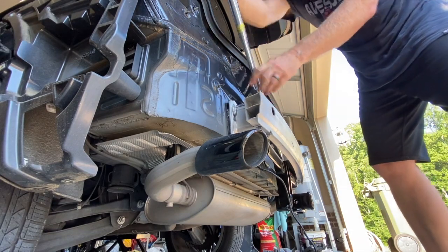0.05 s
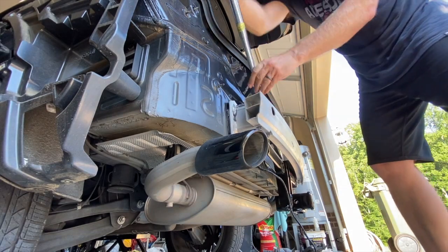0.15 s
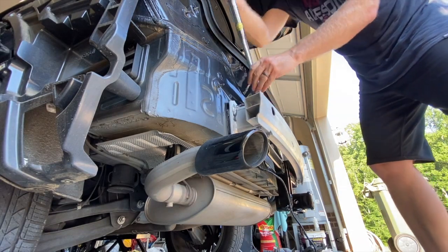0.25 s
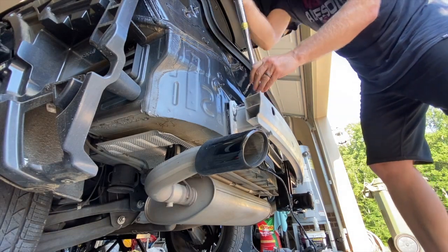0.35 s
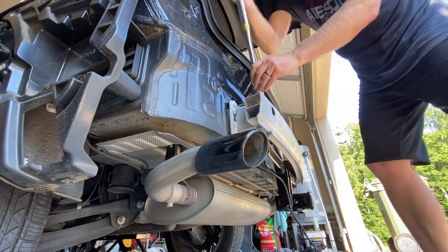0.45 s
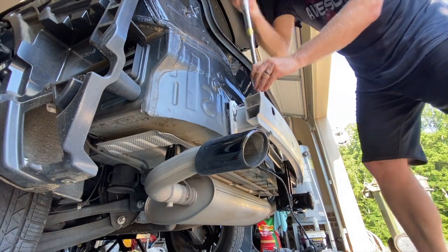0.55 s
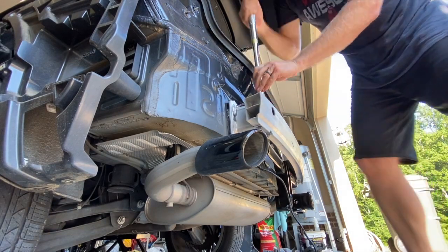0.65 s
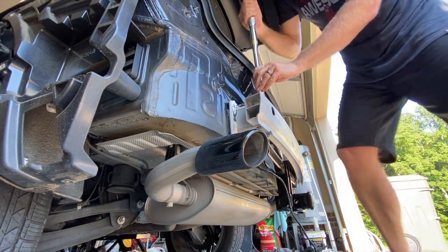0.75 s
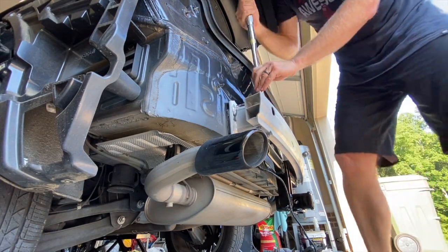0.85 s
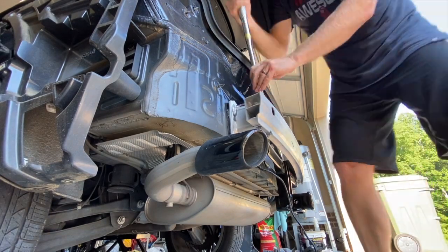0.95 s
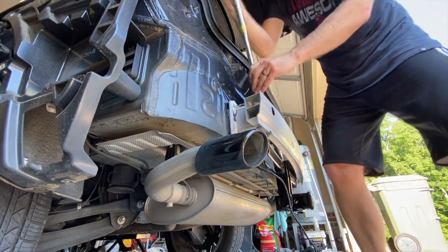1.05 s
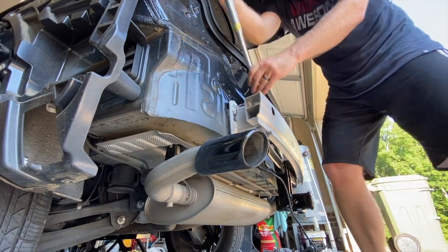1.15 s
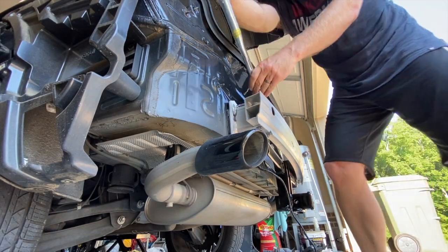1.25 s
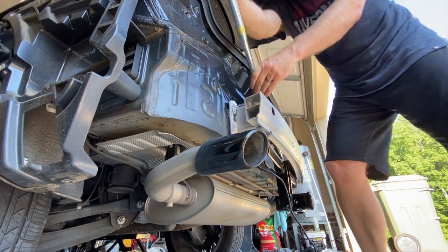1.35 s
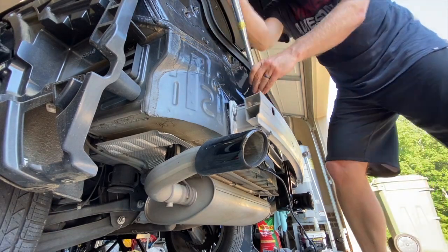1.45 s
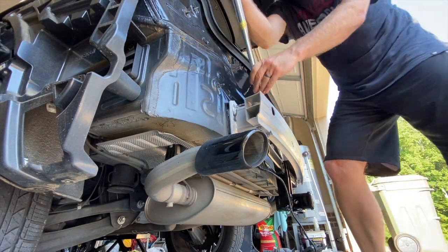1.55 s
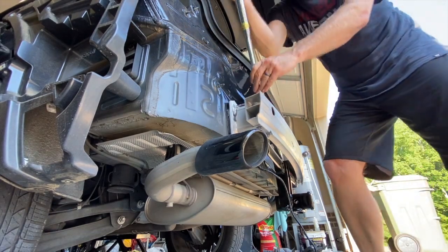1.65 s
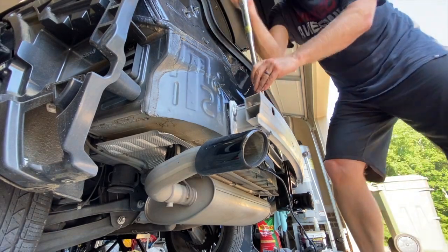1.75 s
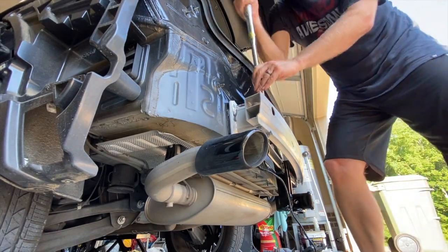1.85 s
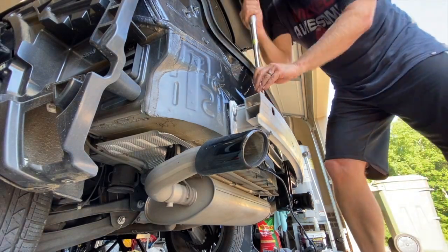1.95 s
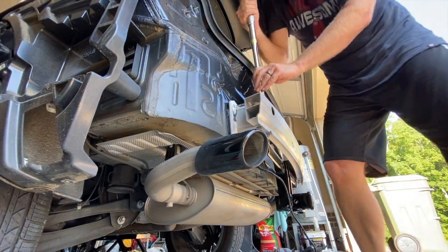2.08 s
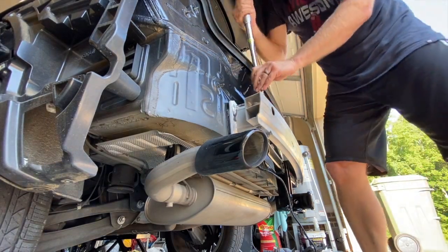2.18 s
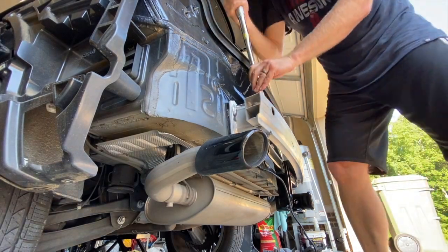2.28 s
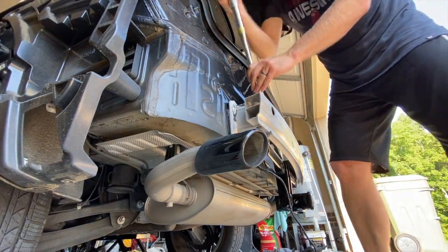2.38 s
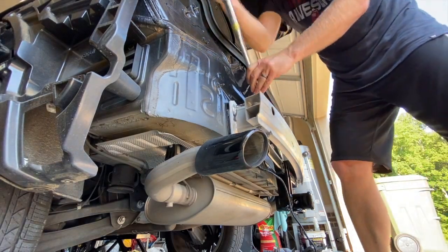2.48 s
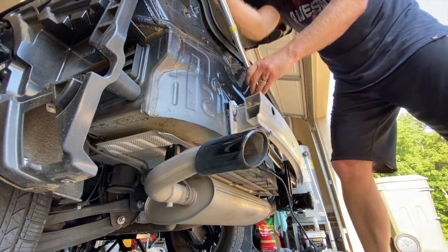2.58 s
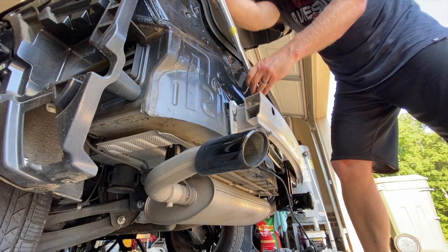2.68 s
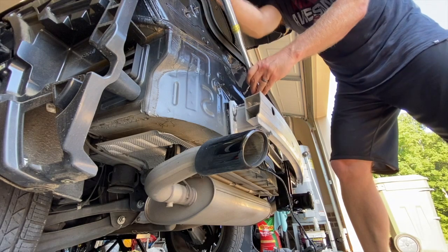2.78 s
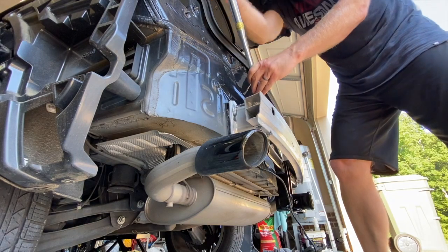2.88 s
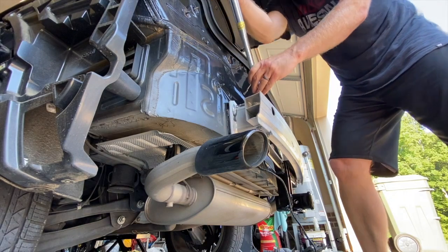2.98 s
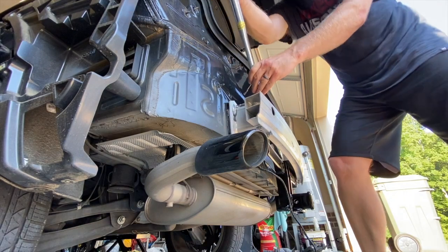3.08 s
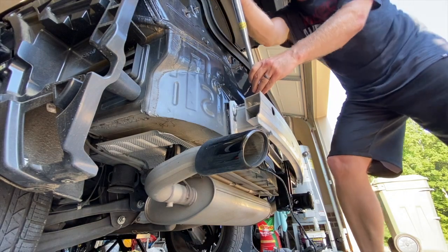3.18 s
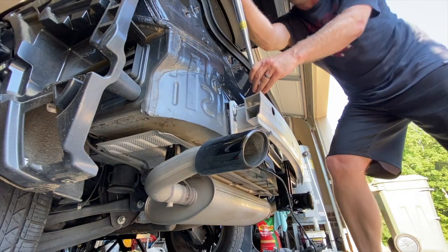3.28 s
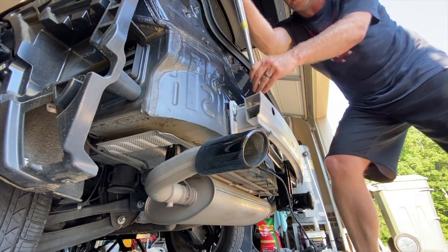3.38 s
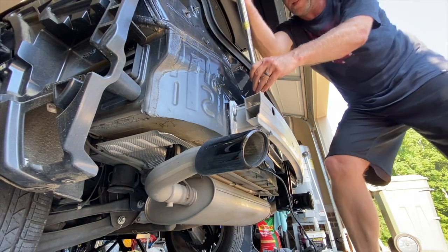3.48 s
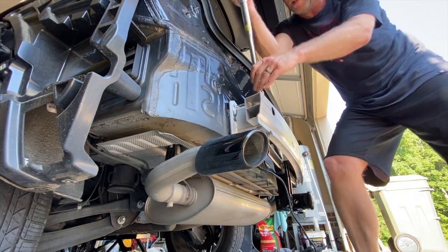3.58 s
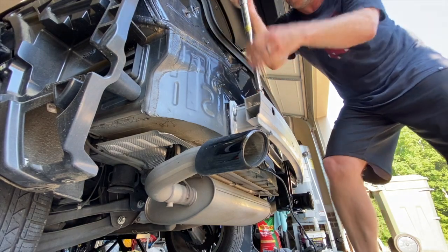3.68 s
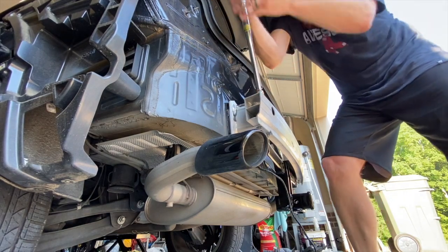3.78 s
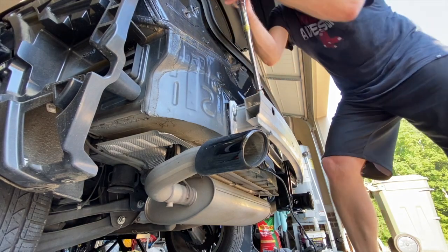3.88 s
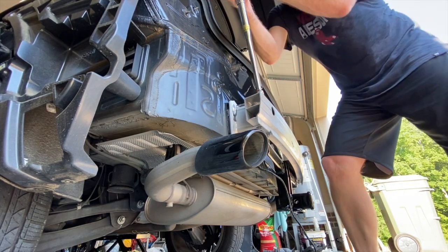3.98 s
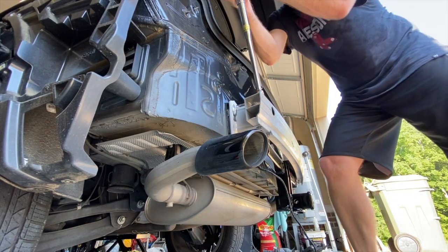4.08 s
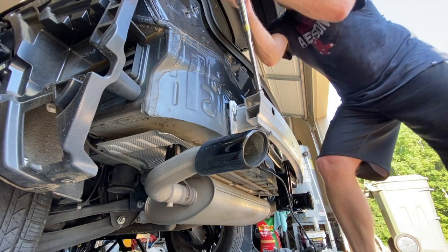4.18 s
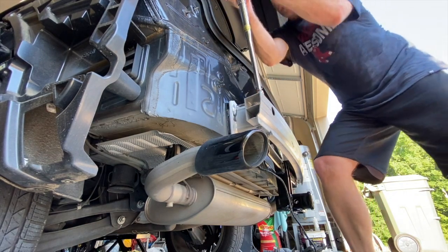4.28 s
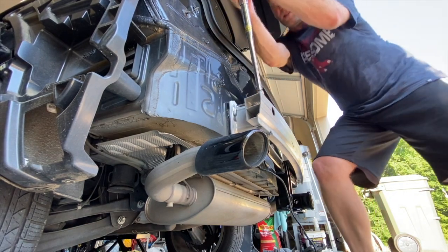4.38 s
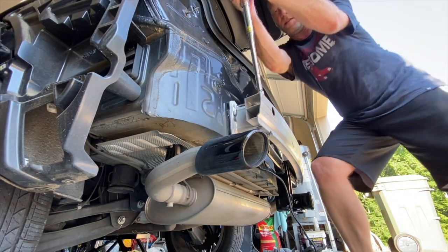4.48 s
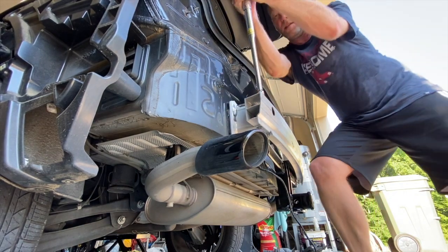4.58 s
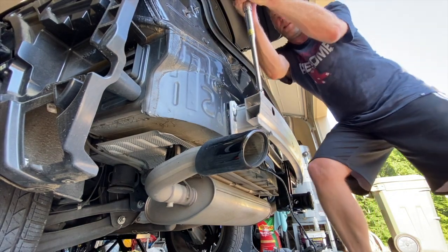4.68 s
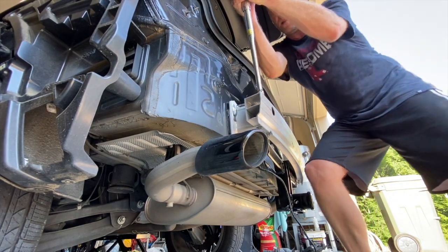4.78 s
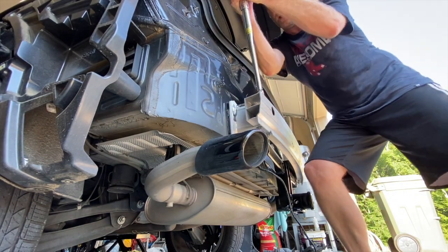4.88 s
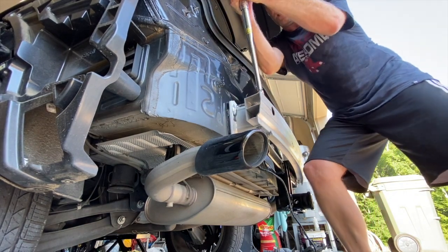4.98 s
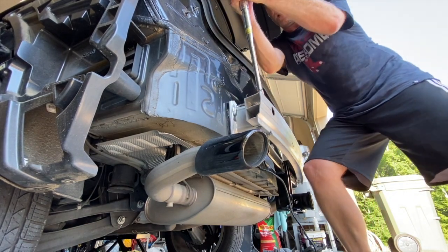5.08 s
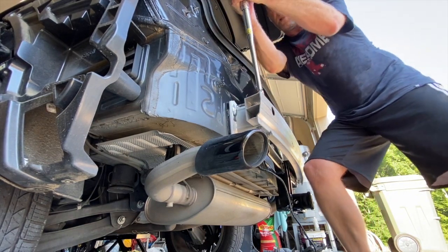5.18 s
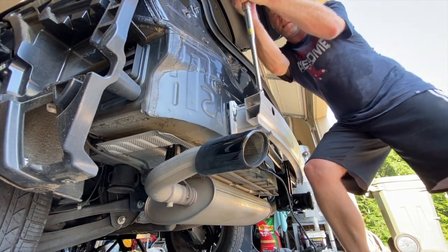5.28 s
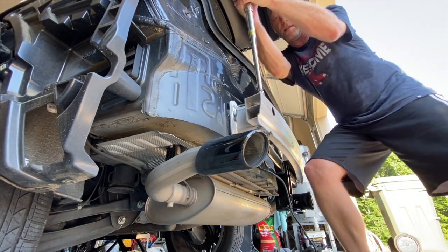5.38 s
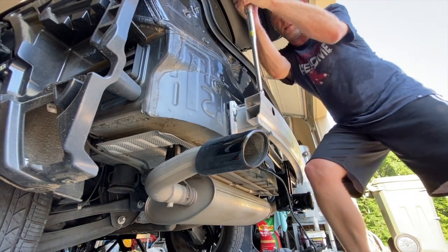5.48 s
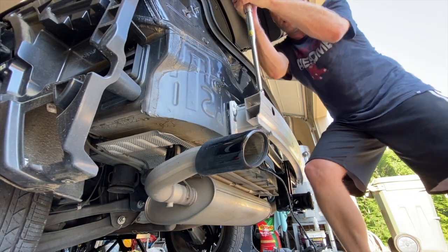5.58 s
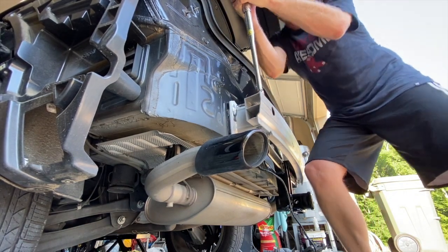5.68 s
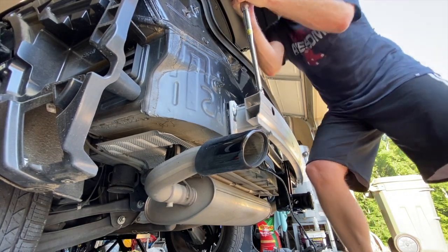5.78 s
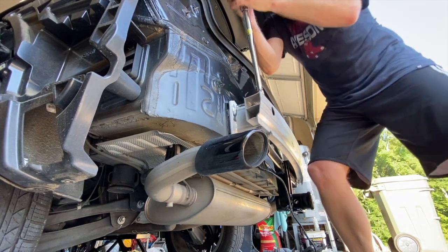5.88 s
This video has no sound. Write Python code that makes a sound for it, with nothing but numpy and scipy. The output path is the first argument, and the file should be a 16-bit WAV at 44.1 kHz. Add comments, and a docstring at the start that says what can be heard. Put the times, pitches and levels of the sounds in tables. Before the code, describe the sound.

Over soft outdoor air and a low machine hum, a hand tool knocks against a hollow car frame. Grainy shoe scuffs, tiny grit cracks and dull body thumps surround two short runs of ratchet clicks. The background is then nearly alone before four hard, bright clacks, unevenly spaced about a third to half a second apart, each with rattling metal and a low rocking thud. Nearby microphone, light garage reverberation.

```python
"""The dying tail of an earlier blow opens the scene over outdoor air, a low hum and motor whine in a garage.
Handle knocks follow, weight shifts in the car as low thumps, grit cracks, and shoes scuff as grainy noise.
A torque wrench on a car frame ratchets in two runs, three single ticks and then a single and two double ticks;
late on its cam snaps over loudly four times, and soft clipping overloads the loudest peaks.
Each blow drives dying panel noise, swelling frame modes and rattling wrench modes; near sounds echo as noise."""
import sys
import numpy as np
from scipy import signal
from scipy.io import wavfile

SR = 44100
rng = np.random.default_rng(int(sys.argv[2]) if len(sys.argv) > 2 else 0)


def wrap_up_sound(samples):
    """Save the sound to the file named by the first command line argument, as 16-bit audio."""
    columns = np.atleast_2d(samples).T
    # keep every value between -1 and 1, then stretch to whole-number steps
    tamed = np.clip(columns, -1, 1)
    steps = np.round(tamed * 32767).astype(np.int16)
    wavfile.write(sys.argv[1], SR, steps)


N = 262174  # samples

# Outdoor air, relative spectral density: (frequency [Hz], density [dB per Hz])
AIR_SPECTRUM = [(18, -31), (30, -4.5), (59, -3.5), (228, -12), (281, -12.5), (859, -27), (2030, -27),
                (2840, -31), (3980, -33), (4310, -33), (9640, -50), (11900, -64.5), (13900, -66),
                (15000, -82)]
# Steady low tones: (frequency [Hz], level before wavering [dB rms])
HUM_TONES = [(42.4, -51), (55.8, -45.5), (125, -62), (148, -58), (241, -56.5)]
# Motor overtones: (multiple of MOTOR_HZ [1], level before wavering [dB rms])
WHINE_OVERTONES = [(56, -75), (58, -71), (60, -74), (61, -76), (65, -73), (66, -70), (68, -74), (69, -71),
                   (70, -71), (89, -77), (92, -78)]
# Left-right likeness of general noise: (frequency [Hz], correlation [1])
NOISE_LIKENESS = [(60, 0.8), (130, 0.82), (290, 0.21), (640, 0.02), (1400, 0.044), (3100, 0.02),
                  (15000, 0.025)]

# Soft blows: the tail of an earlier blow at 0.0 s, a shoe scuff's onset at 0.5143 s, otherwise handle knocks:
# (time [s], drive level [dB], treble corner above KNEE_HZ [octaves], left over right [dB], bass weight [dB])
SOFT_BLOWS = [(0.0, -26.5, 3.5, 3.5, 0.5), (0.1586, -36, 1.2, 4, -5), (0.214, -35.5, 1.7, 0, -4.5),
              (0.2435, -33.5, 2.56, 0, 6.5), (0.2726, -14, 2.83, 1, 5.5), (0.5143, -32, 1.9, -4.5, -25),
              (0.852, -31, 4.4, 4, -1), (0.9394, -33.5, 0.81, 1.5, 0), (1.3009, -33, 0.1, -7, 2),
              (1.4129, -23, 2.2, 2, -2), (2.1567, -39, 1.5, 0, -12), (2.2094, -25.5, 1.27, 2, -11.5),
              (2.2594, -34.5, 2.8, 3, 1), (2.2937, -22, 0.089, 4, 1.3), (2.7498, -36.5, 0.8, -7, -3),
              (2.8089, -37.5, 0.73, 0, 10), (2.8594, -28.5, 2.45, 0, 5.5), (3.674, -29, 1.73, 1.5, -4),
              (5.906, -35.5, 4.2, 8, -25)]
# Drive a soft blow gives the metal: (frequency [Hz], level [dB])
SOFT_DRIVE = [(280, -5.5), (900, -2.5), (1800, -2), (2900, -5), (8500, -9)]
# Tone colour of a soft blow: (frequency [Hz], level [dB])
SOFT_TONE = [(100, -5), (300, 1.5), (1000, 0), (2500, -7), (4500, -2), (6300, 4.5), (10000, 3), (15000, -2)]
# Panels dying, before each blow's damping factor: (frequency [Hz], 60 dB fall [s])
PANEL_T60 = [(150, 0.18), (400, 0.27), (1000, 0.15), (3000, 0.12), (7000, 0.19), (14000, 0.009)]
# Car frame modes, fall before the damping factor: (frequency [Hz], relative level [dB], 60 dB fall [s])
CAR_FRAME_MODES = [(204.3, -10, 0.095), (263.3, 1, 0.19), (316.3, -30.5, 1), (484, -23, 0.17),
                   (513, -29, .2), (630, 7, 0.09), (684, 8, 0.05), (807.2, 4.5, 0.11), (974, 1, 0.045),
                   (1060, -6.5, 0.15), (1250, -10, 0.32), (1333.5, 1, 0.088), (2020, -10.5, 0.17),
                   (2167, -12.5, 0.13)]
# Pawl and handle modes, rattle fall before damping: (frequency [Hz], relative level [dB], 60 dB fall [s])
WRENCH_MODES = [(2773, -3, 0.056), (3060, -7, 0.1), (3650, -2.5, 0.092), (5460, -7.5, .1),
                (6350, -16, 0.037), (6200, -17, 0.12), (9480, -7, 0.11), (10300, -2, 0.1),
                (12900, 0.5, 0.048)]
# Left-right likeness of a blow: (frequency [Hz], correlation [1])
BLOW_SIDES = [(100, 0.63), (300, .7), (700, 0.45), (1500, 0.17), (4000, .1), (15000, .1)]
# Garage echoes dying: (frequency [Hz], 60 dB fall [s])
ECHO_T60 = [(100, 0.894), (300, 0.91), (1000, 0.69), (4000, 0.8), (8000, 0.61), (15000, 0.19)]

# Weight shifting in the car: (time [s], peak before side spread [dB], pitch [Hz])
CAR_THUMPS = [(0.289, -27, 57), (0.93, -33.5, 108), (1.488, -27.5, 52.5), (2.31, -36, 94.2),
              (2.881, -39, 40.2)]
# Grit cracking underfoot, before side spread and echoes: (time [s], peak [dB])
GRIT_CRACKS = [(0.4189, -43.5), (0.9683, -32), (1.563, -34), (1.5923, -33), (1.726, -44), (1.7698, -33),
               (1.7933, -35), (1.7994, -23.5), (1.8117, -26), (2.2612, -32), (2.3096, -31.5), (2.9662, -42),
               (3.5625, -40.5), (3.8718, -35), (4.8194, -42)]
# Shoes sliding: (start [s], length [s], starting level [dB], change over the slide [dB])
SHOE_SCUFFS = [(0.477, 0.2, -40.5, -2.5), (0.689, 0.062, -29.5, -10), (0.837, 0.044, -32.5, -2),
               (0.956, 0.082, -47, -6.5), (1.545, 0.22, -48, -12), (1.75, 0.06, -52.5, 8.5),
               (3.036, 0.062, -60.5, 11.5), (3.089, 0.027, -49, 1), (3.142, 0.19, -51, 8),
               (3.296, 0.053, -48, -1), (3.414, 0.31, -67, -4)]
# Relative spectral density of a slide: (frequency [Hz], density [dB per Hz])
SCUFF_SPECTRUM = [(240, -44), (400, -14), (438, -11), (705, -6), (971, -1), (10400, -14.5), (11900, -25.5),
                  (14300, -5.5), (15500, -21)]

# Pawl clicks, three single ticks, then a single and two close pairs heard as double ticks:
# (time [s], drive level [dB], hardness [dB per octave of treble], left over right [dB])
PAWL_CLICKS = [(1.0294, -20.5, 1.4, 0), (1.1067, -18, -0.11, 1.5), (1.183, -17, -1.7, 0.5),
               (2.39, -18.5, -0.1, 2.5), (2.484, -29.5, 2, 1.5), (2.4913, -21.5, 0.8, 2.5),
               (2.607, -29, 3, -2), (2.6199, -19, -0.77, 2.5)]
# Drive a pawl gives the metal: (frequency [Hz], level [dB])
PAWL_DRIVE = [(280, -9), (900, -3.5), (2900, 5), (8500, 7.5)]
# Tone colour of a pawl click: (frequency [Hz], level [dB])
PAWL_TONE = [(150, -21), (300, -1.5), (800, -3), (1300, 1.5), (2000, -9.5), (3200, -3), (4500, -1.5),
             (6000, 1.5), (7800, -9), (10000, 0), (12000, -11.5), (13500, 3.5)]
# Cam snaps: (time [s], drive level [dB], hardness [dB per octave of treble], left over right [dB])
CAM_SNAPS = [(4.5136, -7.5, -0.5, 4), (4.8508, -9.5, -0.5, 1), (5.3444, -9.5, 1.5, 4), (5.7064, -9, -1, 1)]
# Drive the cam gives the metal: (frequency [Hz], level [dB])
CAM_DRIVE = [(280, -6.5), (900, 1.5), (2900, 5), (8500, -2.5)]
# Tone colour of a cam snap: (frequency [Hz], level [dB])
CAM_TONE = [(130, -26.5), (260, 7.5), (420, -2), (800, 1), (1400, -6.5), (2100, -0.5), (3000, -9.5),
            (4200, -22.5), (5000, 0.5), (7400, 9), (11000, 2), (15000, 16)]
# Cam modes, rattle fall before damping: (frequency [Hz], relative level [dB], 60 dB fall [s])
CAM_RATTLE_MODES = [(3710, -9.5, 0.079), (4130, -3, 0.15), (4240, 4.5, 0.1), (4480, -13.5, 0.058),
                    (5440, -8.5, 0.25), (6300, -11.5, 0.36), (6590, -10, 0.12), (7500, -10, 0.081),
                    (7340, -5, .11), (7840, -23, .1)]

EDGES = 100 * 2 ** np.arange(0, 7.4, 1 / 3)   # third-octave band edges, Hz
AIR_DB, MOTOR_HZ = -44.5, 58.74
HUM_WAVER_DB, WHINE_WAVER_DB = 1.0, 2.2   # spread of the slow level drift
BASS_HZ, KNEE_HZ = 280, 900   # bass weight acts fully below the first, fades out at the second
SOFT_FALL_DB_PER_OCTAVE = 15   # a soft contact loses its treble
STEEL_HZ, TOP_HZ = 3500, 8500   # hardness tilts a steel blow between these
RATTLE_RISE = 3.3   # the rattle builds this many times slower than rise_ms
LOOSE_CYCLES = 45   # 60 dB fall of a rattling mode: damped by the hand but fed by rattling
GARAGE_DB = -15.5
GRIT_HZ = (7000, 10500)   # pitch range of the cracks
SCUFF_ATTACK_S, SCUFF_FALL_DB_PER_S = 0.017, 284
SCUFF_LUMPS_DB = 1.2   # slow unevenness of a slide
DRONE_START_S, DRONE_LENGTH_S, DRONE_HZ, DRONE_DB = 3.04, 0.36, 298, -52
DRONE_ATTACK_S, DRONE_FALL_DB_PER_S = 0.076, 90
RECOIL_LAG_S, RECOIL_DB, RECOIL_HZ = 0.042, -32.5, 82   # peak level before side spread
MIC_LOW_HZ, CUTOFF_HZ = 39.2, 15650


def from_db(db):
    """Decibels to gain."""
    return 10 ** (np.asarray(db) / 20)


def rms_one(x):
    """Scale to unit rms."""
    return x / np.sqrt(np.mean(x ** 2) + 1e-20)


def at_hz(points, hz):
    """Read a spectrum table on a log frequency axis."""
    table = np.array(points)
    return np.interp(np.log(hz), np.log(table[:, 0]), table[:, 1])


def drift(rate_hz):
    """Random wandering of spread 1: noise low-passed at the rate, made on every 40th sample."""
    r = np.exp(-80 * np.pi * rate_hz / SR)
    noise = rng.standard_normal(N // 40 + 2002)
    slow = signal.lfilter([1], [1, -2 * r, r * r], noise)[2000:]
    return np.interp(np.arange(N) / 40, np.arange(len(slow)), rms_one(slow))


def hold(start_s, length_s, level_db, change_db, attack_s, fall_db_per_s):
    """Gain of one sustained event: attack, sloping hold, release."""
    t = np.arange(N) / SR - start_s
    slope_db = change_db * np.clip(t / length_s, 0, 1)
    release_db = fall_db_per_s * np.maximum(t - length_s, 0)
    return from_db(level_db + slope_db - release_db) * np.clip(t / attack_s, 0, 1)


def noise_bands(edges, likeness=NOISE_LIKENESS):
    """Stereo noise bands of about unit rms; shared and opposed noise set how alike the sides are."""
    white = rng.standard_normal((2, 2, N))
    for k, (low, high) in enumerate(zip(edges, edges[1:])):
        band_pass = signal.butter(2, [low, high], "band", fs=SR, output="sos")
        mid, side = rms_one(signal.sosfilt(band_pass, white[k % 2]))
        hz = np.sqrt(low * high)
        alike = np.clip(at_hz(likeness, hz), -1, 1)
        shared = np.sqrt(1 + alike) * mid
        opposed = np.sqrt(1 - alike) * side * [[1], [-1]]
        yield hz, high - low, (shared + opposed) / np.sqrt(2)


def outdoor_air():
    """Broadband air: noise bands whose levels drift separately."""
    air = 0
    for hz, width, band in noise_bands(np.geomspace(32, 15000, 24)):
        air = air + from_db(at_hz(AIR_SPECTRUM, hz) + drift(8)) * np.sqrt(width) * band
    return from_db(AIR_DB) * rms_one(air)


def machine_hum():
    """Low hum tones and high motor overtones, each a sine of wavering level."""
    t = np.arange(N) / SR
    hum = 0
    for hz, level_db in HUM_TONES + [(k * MOTOR_HZ, db) for k, db in WHINE_OVERTONES]:
        high = hz > 1000
        gain = from_db(level_db + (WHINE_WAVER_DB if high else HUM_WAVER_DB) * drift(1.6))
        phase = rng.random((1 + high, 1))   # high tones get a phase for each side
        hum = hum + np.sqrt(2) * gain * np.sin(2 * np.pi * (hz * t + phase))
    return hum


def dying(clicks, t60):
    """Each click starts an exponential fall."""
    return signal.lfilter([1], [1, -from_db(-60 / (max(t60, .001) * SR))], clicks + 1e-18)


def ring(force, hz, t60):
    """One resonant mode; a unit click rings at height 1."""
    r, w = from_db(-60 / (t60 * SR)), 2 * np.pi * hz / SR
    push = .5 / np.sin(w / 2)
    return signal.lfilter([push, -push], [1, -2 * r * np.cos(w), r * r], force + 1e-18) * np.sin(w)


def train(rows, gains, late_s=0):
    """Clicks at the row times, one track a side."""
    out = np.zeros((2, N))
    at = np.round((rows[:, 0] + late_s * np.ones((2, 1))) * SR).astype(int)
    out[[[0], [1]], np.minimum(at, N - 1)] = gains
    return out


def panel_shudder(rows, strength, colour, damping, rise_ms):
    """Panels shake: noise builds and dies band by band."""
    out = np.zeros((2, N))
    for hz, width, band in noise_bands(EDGES, BLOW_SIDES):
        # lows travel through the frame and build more slowly
        rise = np.exp(-1000 / (SR * rise_ms * (1 + 1100.0 / hz)))
        fall = dying(train(rows, strength(hz)), at_hz(PANEL_T60, hz) * damping)
        out += from_db(at_hz(colour, hz)) * band * signal.lfilter([1 - rise], [1, -rise], fall)
    return out


def frame_swell(rows, strength, colour, damping, swell_ms):
    """The frame swells: a short ring at each mode's pitch feeds the mode itself."""
    out, n = np.zeros((2, N)), len(rows)
    for hz, level_db, t60 in CAR_FRAME_MODES:
        uneven = from_db(rng.normal(0, 2.68, (1, n)) + rng.normal(0, 1.57, (2, n)))
        common, own = rng.random((1, n)), rng.random((2, n))
        # upper modes reach the two sides out of step
        late_s = (common + 0.62 * (1 - at_hz(BLOW_SIDES, hz)) * own) / hz
        clicks = train(rows, strength(hz) * uneven, late_s)
        fed = ring(clicks, hz, swell_ms / 1000) / (swell_ms * SR / 14000)
        out += from_db(level_db + at_hz(colour, hz)) * ring(fed, hz, t60 * damping)
    return out


def wrench_rattle(rows, strength, modes, damping, rise_ms):
    """The wrench rattles: bursts of noise force keep its loose modes ringing."""
    out, noise = np.zeros((2, N)), rng.standard_normal((2, N))
    rattle = noise + 0.099 * noise[::-1]   # a little of the opposite side
    rise = np.exp(-1 / (RATTLE_RISE * rise_ms * SR / 1000))
    for hz, level_db, t60 in modes:
        uneven = from_db(rng.normal(0, 2.5, (2, len(rows))))
        fall = dying(train(rows, strength(hz) * uneven), t60 * damping)
        force = signal.lfilter([1 - rise], [1, -rise], fall) * rattle
        even_out = np.sqrt(14 * hz / (LOOSE_CYCLES * SR))   # offsets the build-up of a long ring
        out += from_db(level_db) * ring(force, hz, LOOSE_CYCLES / hz) * even_out
    return out


def blows(rows, contact, drive, colour, modes, shudder_db, frame_db, ring_db, damping, rise_ms, swell_ms):
    """Blows on metal: panel shudder, frame swell and wrench rattle from the same rows."""
    rows = np.array(rows)

    def strength(hz):
        """Gain of each blow at one frequency, left and right."""
        sides_db = rows[:, 3] * [[.5], [-.5]]
        return from_db(rows[:, 1] + at_hz(drive, hz) + contact(rows, hz) + sides_db)

    out = from_db(shudder_db) * panel_shudder(rows, strength, colour, damping, rise_ms)
    out += from_db(frame_db) * frame_swell(rows, strength, colour, damping, swell_ms)
    return out + from_db(ring_db) * wrench_rattle(rows, strength, modes, damping, rise_ms)


def soft_contact(rows, hz):
    """A soft blow: treble falls off above its corner, weight fills or thins the bass (dB)."""
    below = np.log(KNEE_HZ / np.clip(hz, BASS_HZ, KNEE_HZ)) / np.log(KNEE_HZ / BASS_HZ)
    octaves_over = np.maximum(np.log2(hz / KNEE_HZ) - rows[:, 2], 0)
    return rows[:, 4] * below - SOFT_FALL_DB_PER_OCTAVE * octaves_over


def soft_blows():
    """An earlier blow's tail, handle knocks and one scuff onset, all made as treble-softened blows."""
    return blows(SOFT_BLOWS, soft_contact, SOFT_DRIVE, SOFT_TONE, WRENCH_MODES, shudder_db=-9.5,
                 frame_db=-6.0, ring_db=-7.5, damping=1.0, rise_ms=0.72, swell_ms=37)


def garage(x):
    """Diffuse echoes: noise that dies band by band, faded in up to the first wall."""
    t = np.arange(SR) / SR
    tail = 0
    for hz, width, band in noise_bands(EDGES[::2]):
        tail = tail + np.sqrt(width) * band[:, :SR] * from_db(-60 * t / at_hz(ECHO_T60, hz))
    tail = tail * np.clip(t / 0.0029, 0, 1)
    tail = tail / np.sqrt(np.sum(tail ** 2) / 2)
    return from_db(GARAGE_DB) * signal.fftconvolve(x.mean(axis=0)[None], tail)[:, :N]


def single_rings(rows, cycles, rise_cycles):
    """Each event is a sine at its own pitch, falling 60 dB in the given cycles."""
    out = np.zeros((2, N + SR))
    side_spread_db = rng.normal(0, 1.6, (len(rows), 2))
    for (s, peak_db, hz), sides_db in zip(rows, side_spread_db):
        turns = np.arange(SR // 2) / SR * hz
        shape = from_db(-60 * turns / cycles) * (1 - np.exp(-turns / rise_cycles))
        wave = np.sin(2 * np.pi * turns) * shape
        start = round(s * SR)
        out[:, start:start + len(wave)] += from_db(peak_db + sides_db)[:, None] * wave / np.abs(wave).max()
    return out[:, :N]


def car_thumps():
    """Weight shifts in the car: heavily damped low rings."""
    return single_rings(CAR_THUMPS, cycles=7.8, rise_cycles=0.67)


def grit_cracks():
    """Grit cracks underfoot: tiny high rings of random pitch."""
    cracks = [(s, peak_db, rng.uniform(*GRIT_HZ)) for s, peak_db in GRIT_CRACKS]
    return single_rings(cracks, cycles=5, rise_cycles=.3)


def scuffs():
    """Sand under a sliding sole: coloured noise roughened by drifts at three rates."""
    pressure = sum(hold(*row, SCUFF_ATTACK_S, SCUFF_FALL_DB_PER_S) for row in SHOE_SCUFFS)
    grain = from_db(SCUFF_LUMPS_DB * drift(25) + 1.6 * drift(54) + 2.1 * drift(250))
    sand = sum(from_db(at_hz(SCUFF_SPECTRUM, hz)) * np.sqrt(width) * band
               for hz, width, band in noise_bands(EDGES[6::2]))
    return pressure * rms_one(grain * sand)


def steel_contact(rows, hz):
    """Steel on steel: the harder, the brighter (dB)."""
    return rows[:, 2] * np.log2(np.clip(hz, STEEL_HZ, TOP_HZ) / STEEL_HZ)


def ratchet():
    """The pawl ticks, single and double: small steel blows into panels, frame and wrench."""
    return blows(PAWL_CLICKS, steel_contact, PAWL_DRIVE, PAWL_TONE, WRENCH_MODES, shudder_db=-8.5,
                 frame_db=-2.5, ring_db=-3.5, damping=0.91, rise_ms=0.59, swell_ms=52)


def drone():
    """A faint steady sine comes and goes once."""
    t = np.arange(N) / SR
    gain = hold(DRONE_START_S, DRONE_LENGTH_S, DRONE_DB, 0, DRONE_ATTACK_S, DRONE_FALL_DB_PER_S)
    return gain * np.sqrt(2) * np.sin(2 * np.pi * DRONE_HZ * t)


def cam_releases():
    """The release cam snaps over: loud steel blows with the cam's own modes rattling."""
    return blows(CAM_SNAPS, steel_contact, CAM_DRIVE, CAM_TONE, CAM_RATTLE_MODES, shudder_db=-7,
                 frame_db=-7, ring_db=-4.5, damping=0.9, rise_ms=0.38, swell_ms=44)


def car_recoil():
    """The car rocks just after each release: a damped low ring."""
    recoils = [(row[0] + RECOIL_LAG_S, RECOIL_DB, RECOIL_HZ) for row in CAM_SNAPS]
    return single_rings(recoils, cycles=7.8, rise_cycles=0.67)


def scene():
    """Wrench and feet echo in the garage; car thumps and background stay dry."""
    background = outdoor_air() + machine_hum() + drone()
    near = soft_blows() + grit_cracks() + scuffs() + ratchet() + cam_releases()
    return background + near + garage(near) + car_thumps() + car_recoil()


def record(dry):
    """The microphones overload on the loudest peaks; the deep bass and the top are cut."""
    clipped = dry / (1 + np.abs(dry / .97) ** 6) ** (1 / 6)
    low_cut = signal.butter(4, MIC_LOW_HZ, "high", fs=SR, output="sos")
    top_cut = signal.cheby2(12, 60, CUTOFF_HZ * 1.04, fs=SR, output="sos")
    return signal.sosfilt(top_cut, signal.sosfilt(low_cut, clipped))


dry = scene()
out = record(dry)
wrap_up_sound(out)
```